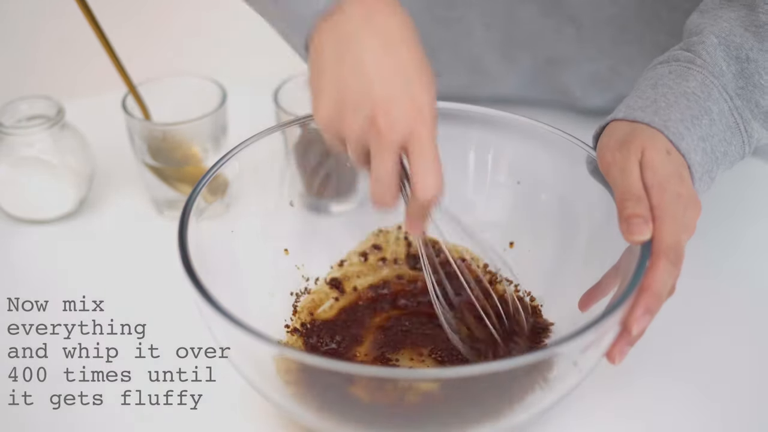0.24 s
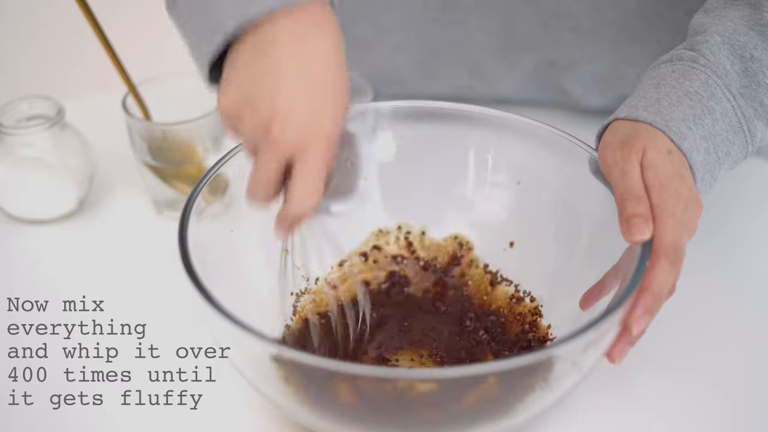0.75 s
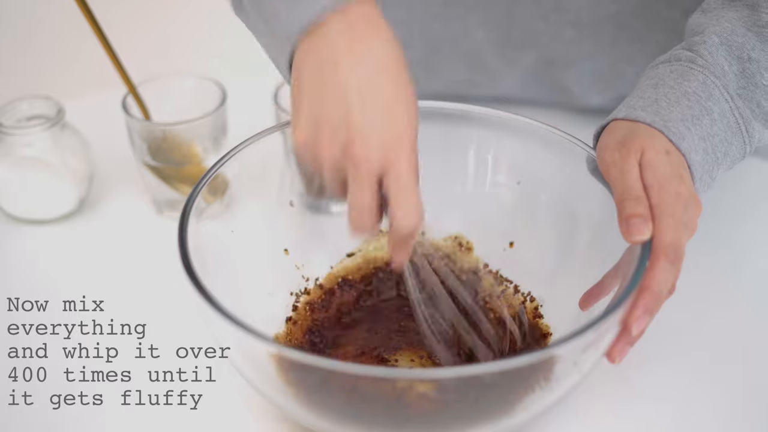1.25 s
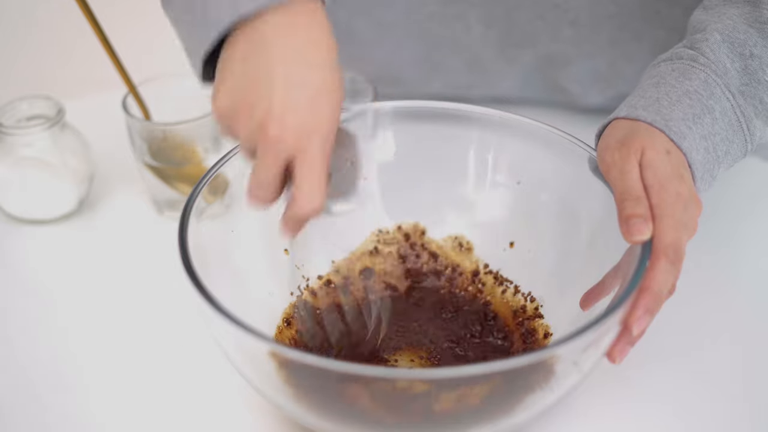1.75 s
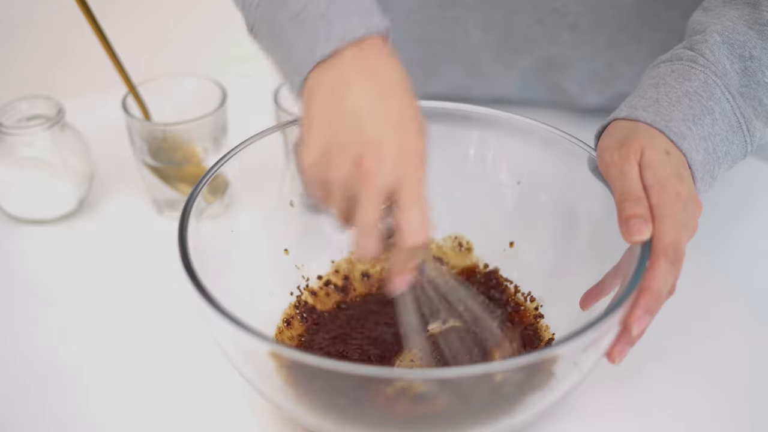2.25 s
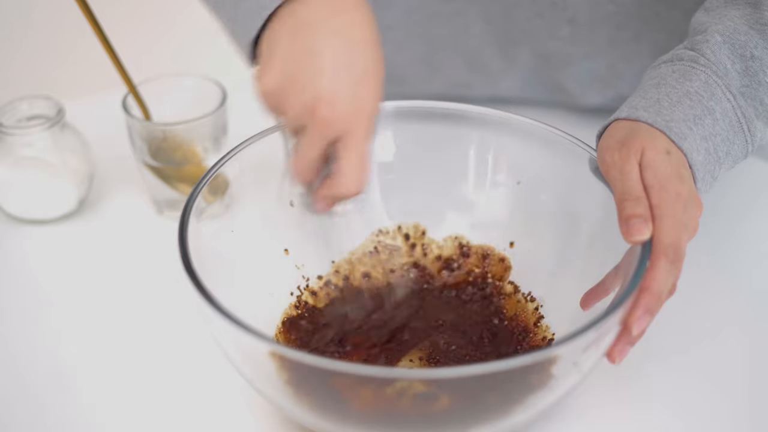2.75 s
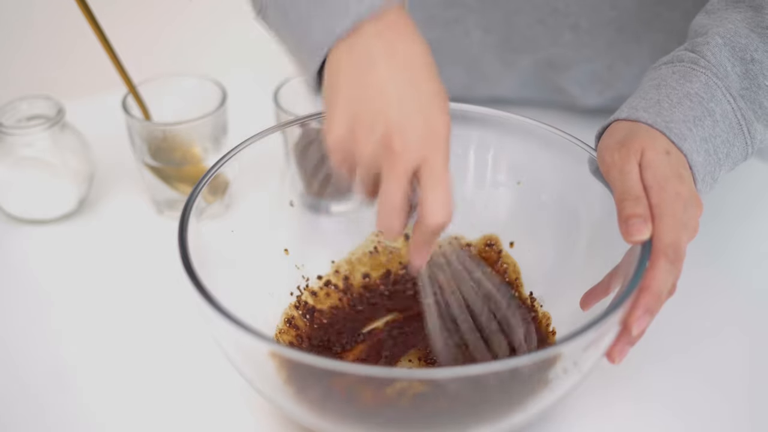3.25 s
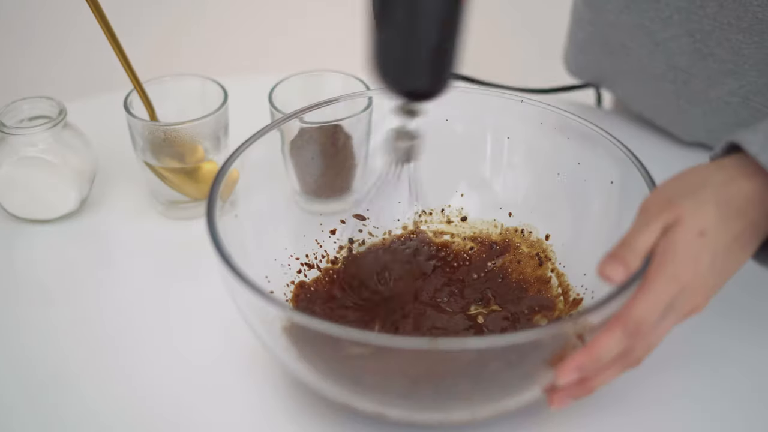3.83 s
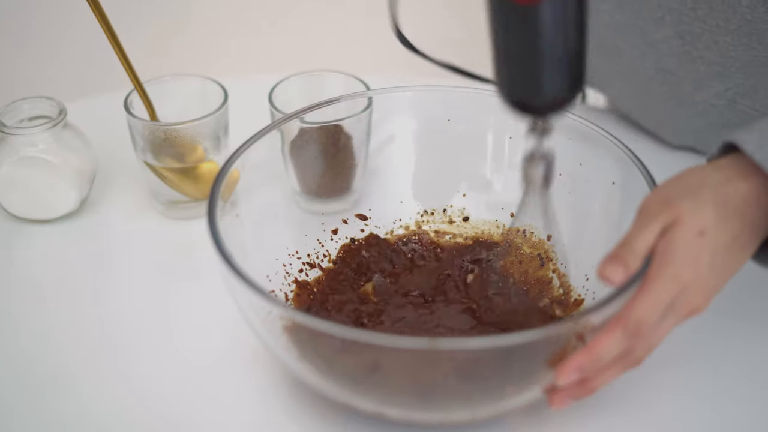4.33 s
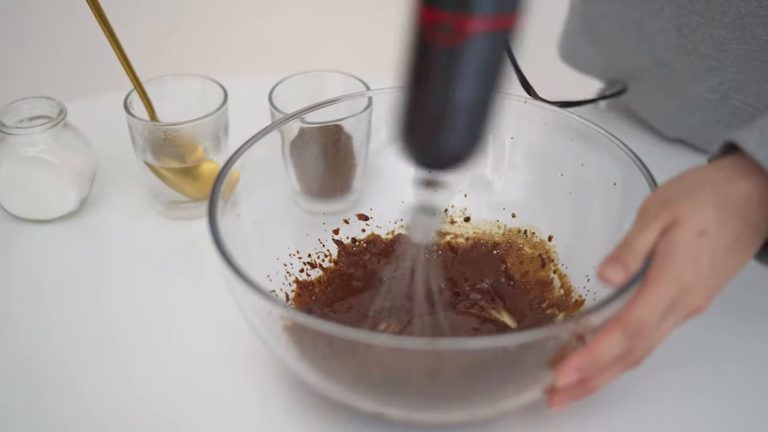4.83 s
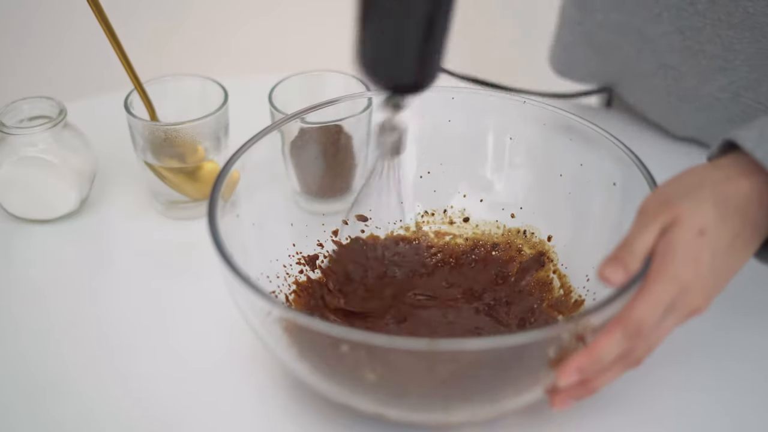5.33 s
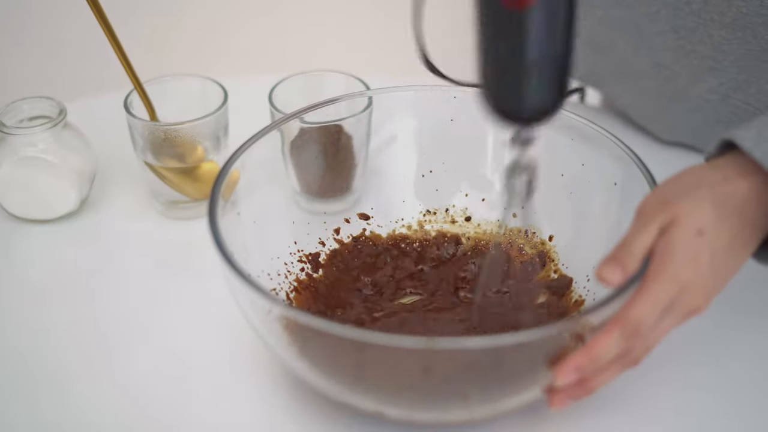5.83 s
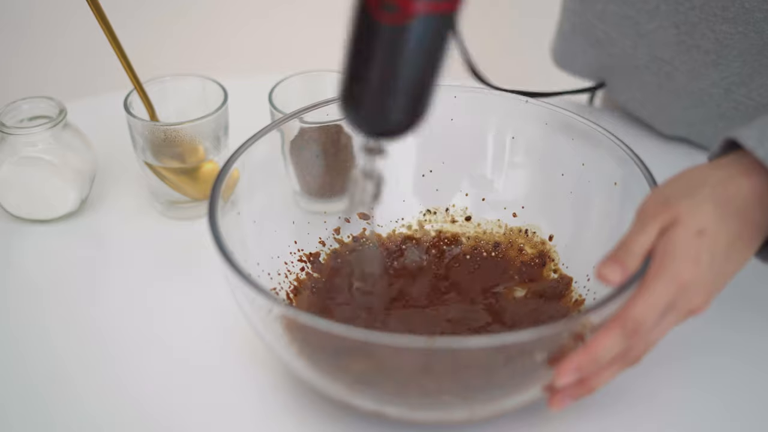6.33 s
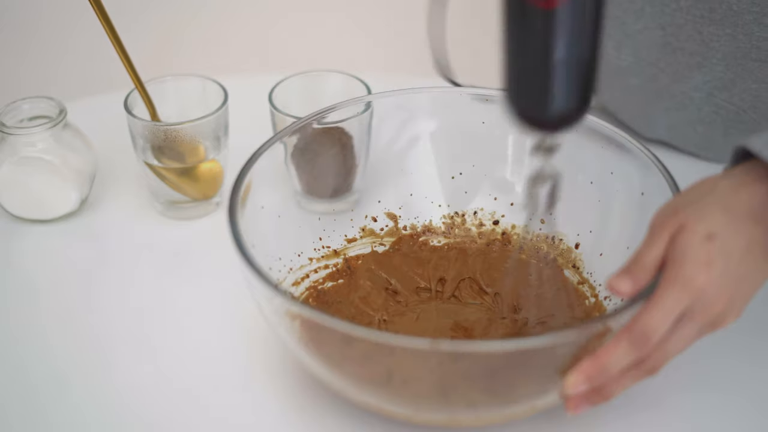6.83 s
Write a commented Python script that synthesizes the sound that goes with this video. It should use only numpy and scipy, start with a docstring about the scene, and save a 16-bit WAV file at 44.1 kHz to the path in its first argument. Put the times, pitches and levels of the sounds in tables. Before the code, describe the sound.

Brisk hand whisking of wet coffee paste in a glass bowl, three strokes a second, cut suddenly to a buzzing electric whisk drumming the bowl.

```python
"""A wire whisk scrapes, ticks and squelches round a glass bowl of thick coffee paste, three turns a second.
Slipping contacts excite the ringing wires, popping air makes the squelch, and bumps knock the bowl softly.
Then an electric whisk takes over at once: dense random hits ring its wires in a pulsing whirr,
spatter the paste and drum the wall of the bowl, with rattles and snaps on top.
The kitchen is small and quiet: a short tail of sparse reflections over a faint hush of noise."""
import sys
import numpy as np
from scipy import signal
from scipy.fft import rfft, irfft, next_fast_len
from scipy.io import wavfile

SR = 44100
rng = np.random.default_rng(int(sys.argv[2]) if len(sys.argv) > 2 else 0)


def bounce(signal):
    """Save signal as a 16-bit WAV file at the path given by the first command-line argument."""
    frames = np.transpose(np.atleast_2d(signal))
    limited = np.clip(frames, -1, 1)
    pcm = np.round(limited * 32767).astype(np.int16)
    wavfile.write(sys.argv[1], SR, pcm)


N = 311787
TIME = np.arange(N) / SR
SWITCH_S = 3.487  # the electric whisk takes over

# turns of the hand whisk, a push along the glass and a sweep back:
# (time [s], force of push [dB], length of push [s], force of sweep back [dB])
TURNS = [(0.145, -52, 0.027, -95), (0.476, -54, 0.05, -60), (.795, -52.5, 0.053, -73),
         (1.138, -54, 0.11, -75), (1.446, -54, 0.065, -58.5), (1.795, -51, 0.031, -60.5),
         (2.15, -57.5, 0.044, -59), (2.46, -57.5, 0.053, -60), (2.781, -58.5, 0.047, -79),
         (3.06, -57.5, 0.24, -68), (3.336, -58, 0.11, -58)]
# modes of the hand whisk's wires against the glass: (frequency [Hz], width [Hz], height [dB])
HAND_WIRES = [(1150, 130, -3), (2710, 90, 3), (4630, 110, 8.5), (6017, 47, 13), (6300, 31, 2),
              (7380, 80, 9), (9614, 110, 10.5), (11000, 160, 3), (12200, 110, 3)]
# ringing hiss of wires that builds up in the last turns by hand: (time [s], level [dB])
HISS = [(2.85, -87), (2.99, -58.5), (3.2, -60.5), (3.35, -57.5)]
# groups of fainter short rings: (frequency [Hz], scatter of pitch [share], level [dB])
GLINTS = [(1098, 0.085, -75.5), (2636, 0.055, -76), (4690, 0.04, -67.5)]
# a wire rubs along the wet glass in a short rough squeak: (time [s], frequency [Hz], level [dB])
SQUEAKS = [(0.331, 6200, -62.5), (0.344, 4630, -59.5), (0.408, 2750, -64), (0.466, 6010, -58),
           (0.709, 4580, -61), (0.784, 5920, -62), (1.135, 7340, -54.5), (1.163, 9260, -60),
           (1.26, 4660, -60.5), (1.48, 1160, -65.5), (1.733, 2780, -60), (2.261, 4770, -58),
           (2.373, 2910, -61), (2.45, 4530, -58), (2.517, 1082, -62.5), (3.081, 2850, -57.5),
           (3.265, 1009, -67.5)]
# a wire flicks against the glass: (time [s], level [dB], prominence of the wire's ring [dB])
TICKS = [(0.1304, -35, 4.5), (0.452, -46, -19), (.6786, -50, -5), (1.052, -40.5, 17), (1.109, -41, 9),
         (1.411, -46.5, -2), (1.4537, -43.5, 3), (1.7752, -41.5, 1), (2.030, -49.5, 13),
         (2.1271, -46.5, -1), (2.251, -47.5, -7), (2.295, -49.5, -29), (2.4315, -52, -17),
         (2.437, -44.5, -5), (2.482, -47.5, -21), (2.5926, -60, 4), (2.608, -45.5, 16),
         (2.6463, -47.5, -21), (3.124, -47, -24)]
# the whisk bumps the bowl through the paste: (time [s], relative strength [dB])
KNOCKS = [(0.53, -72), (1.117, -71), (1.183, -73), (1.327, -71), (1.494, -69), (1.778, -74.5),
          (2.294, -69.5), (2.444, -70), (2.653, -68), (3.042, -65.5), (3.253, -71)]
# low modes of the bowl on the table: (frequency [Hz], relative level [dB], t60 [s])
BOWL = [(198, -13.5, 0.26), (317, -1.5, 0.13), (351.6, -0.5, 0.16), (549.3, 2, 0.19), (601, 1.5, 0.13)]
# the circling electric whisk leans on the wall of the bowl: (time [s], force [dB], length [s])
LEANS = [(3.565, -55.5, 0.28), (3.944, -50.5, 0.15), (4.327, -50, 0.077), (4.717, -49.5, 0.2),
         (5.067, -48.5, 0.093), (5.165, -51, 0.11), (5.438, -51, 0.052), (5.772, -50.5, 0.1),
         (6.14, -51.5, 0.093), (6.478, -53, 0.087), (6.785, -52.5, 0.054), (6.962, -52.5, 0.038)]
# force of the electric whisk between leans, lighter where it rides up in the paste: (time [s], force [dB])
FREE_FORCE = [(3.7, -52), (4.55, -52.5), (4.88, -55), (5.55, -54), (6.35, -54.5), (6.87, -55.5)]
# rings of the electric whisk's single wires: (frequency [Hz], width [Hz], height [dB])
SPINNING_WIRES = [(4700, 130, 2.5), (5480, 350, -0.5), (9280, 120, 14)]
# rings of the spattering paste and wires: (frequency [Hz], width [Hz], height [dB])
BEATER = [(2193, 170, 13), (6950, 1200, 2.5), (9440, 700, -2)]
# modes of the bowl's wall, drummed while the whisk leans on it: (frequency [Hz], width [Hz], height [dB])
WALL = [(599, 17, 17.5), (870, 130, 14.5)]
# the spinning wires catch the glass and rattle on it: (time [s], level [dB], decay [s])
CLACKS = [(3.487, -44, 0.0053), (3.501, -42, 0.022), (3.548, -44, 0.049), (3.8434, -37.5, 0.005),
          (4.6561, -38, 0.011), (5.068, -43, 0.0039), (5.3124, -39.5, 0.0029), (5.3773, -43, 0.031),
          (5.435, -43, 0.0048), (5.9222, -45, 0.0027), (5.9565, -39, 0.0065), (6.4632, -42, 0.013),
          (6.518, -38, 0.0043), (6.613, -43, 0.05), (6.726, -42.5, 0.022), (7.006, -36.5, 0.0052)]
# a fleck of paste is flung against the wall with a bright snap: (time [s], level [dB])
SPITS = [(3.843, -35.5), (4.016, -38.5), (4.28, -37), (4.596, -35), (4.942, -42), (5.29, -44),
         (5.872, -41.5)]
# broad colour of the scraping wires: (frequency [Hz], relative density [dB per Hz])
SCRAPE = [(300, -63.5), (900, -6), (1800, 1), (3400, -2), (4100, -6), (5200, 3), (6900, 1), (8600, -2),
          (12000, -2.5), (14000, -5), (16000, -10)]
# broad colour of the squelching paste: (frequency [Hz], relative density [dB per Hz])
SQUELCH = [(240, -37), (450, -34.5), (700, -10.5), (950, 0.5), (2000, -9), (3500, 6), (6000, -11),
           (16000, -55)]
# broad colour of the whirring wires, and of the hiss by hand: (frequency [Hz], relative density [dB per Hz])
WHIRR = [(200, -77), (1500, -25.5), (3000, -20), (4150, -11), (4650, -7), (5330, -1), (5800, -4),
         (6300, -8), (6800, -8.5), (7700, -24.5), (16000, -32.5)]
# broad colour of the spatter: (frequency [Hz], relative density [dB per Hz])
SPATTER = [(340, -43), (510, -45.5), (750, -29), (1200, -19.5), (1900, -18), (2750, -6), (3350, 3.5),
           (5300, 0), (7800, -2.5), (9800, 1.5), (13000, -2), (14000, -8), (16000, -19.5)]
# broad colour of the drummed wall: (frequency [Hz], relative density [dB per Hz])
DRUMMING = [(400, -36), (800, -0.5), (2500, -20)]
# broad colour of a flung fleck's snap: (frequency [Hz], relative density [dB per Hz])
SPIT = [(200, -69), (1500, -35), (6500, -11.5), (10500, 10), (16000, -19.5)]
# how long the kitchen's reflections last: (frequency [Hz], t60 [s])
ROOM = [(200, 0.14), (2000, 0.085), (8000, 0.17), (16000, 0.012)]
# broad colour of the room's hush: (frequency [Hz], relative density [dB per Hz])
HUSH = [(20, -9), (90, -4.5), (16000, -7)]

RISE_SHARE = 0.49  # part of a stroke spent pressing in; the rest is the release
BACK_AFTER_S, BACK_LENGTH_S = 0.13, 0.089  # the sweep back follows about half a turn after the push
DRAG_DB, DRAG_DB_PER_S = -61, -3.5  # the steady drag between strokes eases as the paste loosens
GLINT_FOLLOW, CLUSTER_DB = 0.14, 2.8  # dB of ring for each dB of force; unevenness of the clusters
BUMP_DB_PER_OCTAVE = 4  # a short bump favours the higher modes of the bowl
WOBBLE_HZ, WOBBLE_DB = 15.9, 4.5  # while it leans, the whisk bounces off the wall at this rate and depth
# wires sweep past the wall at this rate, faster as the paste thins, and pulse the sound this deeply
PASS_HZ, PASS_HZ_PER_S, PASS_DB = 177, 11, 0.5
THUMP_S, THUMP_DB, THUMP_HZ = 6.487, -66, 483  # one thump: time, relative strength, upper edge
EDGE_HZ = 15800  # upper edge of the whole sound


def hand_whisk():
    """Wires scrape over the glass in short slips, jingle against each other and drag through the paste."""
    force_db = stirring_db()
    hiss_db, = follow(HISS)
    slips_db = 1.3 * wander(64)
    scrape = contacts(700, 2.4, 0.5) * amp(-2.5)
    rings = jingle(rng.uniform(1482, 15000, size=5000), 0.04, 17)
    rubbing = (scrape + amp(-3.0) * rings) * amp(force_db + slips_db)
    metal = wires(rubbing, SCRAPE, HAND_WIRES, hops_per_s=70, scatter=0.029, uneven_db=7)
    # small pockets of air pop in the paste, each at its own pitch
    pops = jingle(rng.uniform(476, 4472, size=6000), 0.033, 12)
    squelch = body(pops * amp(0.43 * force_db + 2 * wander(25) - 48.5), SQUELCH)
    hiss = body(contacts(940, 1.0, 0.54) * amp(hiss_db + slips_db), WHIRR)
    return muffled(metal, 0.2 * (force_db + 59)) + squelch + hiss


def stirring_db():
    """Force of the hand whisk on the glass: a push and a sweep back in each turn, over a steady drag."""
    power = amp(DRAG_DB + DRAG_DB_PER_S * TIME) ** 2
    for s, push_db, length_s, back_db in TURNS:
        push = amp(push_db) * stroke(s, length_s)
        back = amp(back_db) * stroke(s + BACK_AFTER_S, BACK_LENGTH_S)
        power += push ** 2 + back ** 2
    return 10 * np.log10(power)


def stroke(s, length_s):
    """The whisk presses in and lets go, a touch more slowly: a gain that peaks at one at time s."""
    t = (TIME - s) / length_s
    return np.exp(-abs(t) / np.where(t < 0, RISE_SHARE, 1 - RISE_SHARE) / 2)


def muffled(x, open_db, edge_hz=5800):
    """Paste round the wires damps the treble; pressing through to the glass opens it."""
    dull = signal.sosfiltfilt(signal.butter(2, edge_hz, fs=SR, output="sos"), x)
    return dull + (x - dull) * amp(open_db)


def glints():
    """Wires slip on the wet glass and ring for an instant, in uneven clusters that swell with the strokes."""
    press = unit(amp(GLINT_FOLLOW * stirring_db()) * (TIME < SWITCH_S))
    press = press * np.sqrt(SWITCH_S * SR / N)
    out = np.zeros(N)
    for hz, scatter, db in GLINTS:
        pitches_hz = hz * (1 + scatter * rng.standard_normal(size=400))
        out += jingle(pitches_hz, 0.07, 9.5) * amp(db + CLUSTER_DB * wander(15))
    return press * out


def squeaks(length_s=0.096, width_hz=230, drift=0.01533, stutter_db=5):
    """Stick and slip drive one resonance, which drifts in pitch, stutters, and dies as the wire passes."""
    out, t = np.zeros(N), np.arange(round(length_s * SR)) / SR
    swell = np.sin(np.pi * t / length_s)
    bend, grip = 1 + drift * wander(11), amp(stutter_db * wander(56))
    slips = wander(width_hz / 2) + 1j * wander(width_hz / 2)
    for s, hz, db in SQUEAKS:
        now = round(s * SR) + np.arange(len(t))
        phase = 2 * np.pi * np.cumsum(hz * bend[now]) / SR
        ring = (slips[now] * np.exp(1j * phase)).real
        add(out, s - length_s / 2, amp(db) * unit(swell * grip[now] * ring) / np.sqrt(2))
    return out


def ticks():
    """Single wires flick against the bowl: a burst of tiny bounces makes them ring briefly."""
    out = np.zeros(N)
    for s, db, ring_db in TICKS:
        add(out, s, amp(db) * body(chatter(0.0041), SCRAPE, HAND_WIRES, ring_db))
    return out


def knocks():
    """Bumps, and the small shoves of stirring between them, ring the bowl's low modes."""
    t = np.arange(SR // 2) / SR
    out = np.zeros(N)
    for hz, level_db, t60 in BOWL:
        push = amp(-88.0) * rng.standard_normal(N) * (rng.random(N) < 30 / SR)
        tilt_db = BUMP_DB_PER_OCTAVE * np.log2(hz / 400)
        for s, db in KNOCKS:
            favour_db = 2 * rng.standard_normal(1)  # each bump favours other modes
            add(push, s, amp(db - 9.5 + tilt_db + favour_db))
        soft_start = 1 - np.exp(-t / 0.0045)
        ring = amp(level_db - 60 * t / t60) * np.sin(2 * np.pi * hz * t) * soft_start
        out += signal.oaconvolve(push, ring)[:N]
    return out


def electric_whisk():
    """Dense wire hits whirr and ring; spatter and drumming of the wall swell as the whisk bears down."""
    force_db = leaning_db()
    pass_hz = PASS_HZ + PASS_HZ_PER_S * (TIME - SWITCH_S) + 9 * wander(8.9)
    passes = np.cumsum(pass_hz) / SR
    pulse_db = PASS_DB * np.cos(2 * np.pi * passes) + 1.0 * wander(210)  # no two wires strike alike
    judder_db = 1.2 * wander(39)  # the whisk bounces in the hand
    whirr = contacts(1800, 2.7, 0.9) * amp(0.5 * force_db - 19.0 + judder_db + pulse_db)
    hits = contacts(1800, 1.3, 0.73) * amp(judder_db + pulse_db)
    spatter = hits * amp(1.073 * force_db + 6.2)
    drumming = hits * amp(1.388 * force_db - 10.5)
    rattle = clacks() * amp(pulse_db)
    ringing = wires(whirr, WHIRR, SPINNING_WIRES, hops_per_s=55, scatter=.07, uneven_db=9)
    out = ringing + body(rattle, WHIRR)
    out += body(spatter + amp(-3.5) * rattle, SPATTER, BEATER)
    out += body(drumming + amp(-33.5) * rattle, DRUMMING, WALL)
    return out + spits()


def leaning_db():
    """Force of the electric whisk on the glass: each lean swells and fades, and sets the whisk bouncing."""
    free_db, = follow(FREE_FORCE)
    power = amp(free_db) ** 2
    for s, db, length_s in LEANS:
        t = TIME - s
        bounce_db = WOBBLE_DB * np.cos(2 * np.pi * WOBBLE_HZ * t)
        power += amp(db + bounce_db) ** 2 * np.exp(-(2 * t / length_s) ** 2)
    return 10 * np.log10(power)


def clacks():
    """Spinning wires catch the glass: dying bursts of bounces, before the glass and wires colour them."""
    out = np.zeros(N)
    for s, db, decay_s in CLACKS:
        add(out, s, amp(db) * chatter(decay_s))
    return out


def spits():
    """Flecks of paste snap against the wall: short bursts with a bright colour."""
    out = np.zeros(N)
    for s, db in SPITS:
        add(out, s, amp(db) * chatter(0.0037))
    return body(out, SPIT)


def thump():
    """A dull, short, faint thump: one impulse through a low-pass."""
    push = amp(THUMP_DB) * np.sqrt(SR / 100) * (np.arange(N) == round(THUMP_S * SR))
    return signal.sosfilt(signal.butter(4, THUMP_HZ, fs=SR, output="sos"), push)


def kitchen(x):
    """A short tail of sparse reflections, each band dying at its own pace, the extreme treble first."""
    taps = rng.choice([-1., 1.], SR // 2) * (rng.random(SR // 2) < 3000 / SR)
    taps[:round(.004 * SR)] = 0  # no reflection arrives sooner
    hz, t, z = signal.stft(taps, SR, nperseg=256)
    fade = amp(-60 * t / read(ROOM, hz)[:, None])
    tail = signal.istft(z * fade, SR, nperseg=256)[1]
    return signal.oaconvolve(x, tail / np.linalg.norm(tail))[:N]


def room_hush():
    """The quiet room's steady hush: faint coloured noise."""
    return amp(-99) * body(rng.standard_normal(N), HUSH)


def wires(x, spectrum, modes, hops_per_s, scatter, uneven_db, count=12):
    """The contact hops from wire to wire; each is tuned a little differently and favours other modes."""
    touching = rng.integers(0, count, N)[np.cumsum(rng.random(N) < hops_per_s / SR)]
    spread = np.tile(np.linspace(-1, 1, count), (2, len(modes), 1))
    detune, favour = rng.permuted(spread, axis=2)
    hz, width, db = np.transpose(modes)
    out = np.zeros(N)
    for k in range(count):
        own_hz = hz * (1 + scatter * detune[:, k])
        own_modes = np.transpose([own_hz, width, db + uneven_db * favour[:, k]])
        out += body(x * (touching == k), spectrum, own_modes, size=4096)
    return out


def contacts(per_s, spread_db, smooth):
    """Tiny impacts of uneven size over a share of smooth friction, rms one."""
    size = amp(spread_db * np.minimum(rng.exponential(1, N), 4))
    clicks = size * rng.choice([-1, 1], N) * (rng.random(N) < per_s / SR)
    return unit(unit(clicks) + smooth * rng.standard_normal(N))


def chatter(decay_s, size=8192):
    """A wire bouncing on glass: a burst of random signs that starts at one and dies away."""
    return rng.choice([-1, 1], size) * np.exp(-np.arange(size) / SR / decay_s)


def jingle(pitches_hz, t60, spread_db):
    """One short ring for each pitch, at a random moment of the hand whisking, rms one while it lasts."""
    t, out = np.arange(2500) / SR, np.zeros(N)
    fade = amp(-60 * t / t60)
    for hz, (when, strength) in zip(pitches_hz, rng.random((len(pitches_hz), 2))):
        add(out, when * SWITCH_S, amp(spread_db * strength) * fade * np.sin(2 * np.pi * hz * t))
    return unit(out) * np.sqrt(SWITCH_S * SR / N)


def body(x, spectrum, modes=(), ring_db=0, size=8192):
    """Passes x through a causal filter of unit energy: a broad colour with ringing modes on top."""
    hz = np.fft.rfftfreq(size, 1 / SR)
    peaks = sum(amp(db + ring_db) ** 2 / (1 + (2 * (hz - f) / width) ** 2) for f, width, db in modes)
    log_gain = np.log(amp(read(spectrum, hz)) * np.sqrt(1 + peaks))
    # minimum phase: the Hilbert transform of the log gain gives the phase
    circle = np.concatenate([log_gain, log_gain[-2:0:-1]])
    taps = np.fft.ifft(np.exp(np.conj(signal.hilbert(circle)))).real[:size // 2]
    return signal.oaconvolve(x, taps / np.linalg.norm(taps))[:len(x)]


def low_cut(x, hz):
    """A steep high-pass: small parts radiate no deep bass."""
    return signal.sosfilt(signal.butter(4, hz, "highpass", fs=SR, output="sos"), x)


def wander(rate_hz):
    """Smooth chance, fading out above the given rate, rms one."""
    size = next_fast_len(N, True)
    hz = np.fft.rfftfreq(size, 1 / SR)
    shape = (hz > rate_hz / 10) / (1 + (hz / rate_hz) ** 2)
    return unit(irfft(rfft(rng.standard_normal(size)) * shape, size)[:N])


def amp(db):
    """Decibels to gain."""
    return 10 ** (np.asarray(db) / 20)


def unit(x):
    """Scales to an rms of one."""
    return x / np.sqrt(np.mean(x ** 2) + 1e-30)


def read(points, hz):
    """Reads a table on a log-frequency axis."""
    f, value = np.transpose(points)
    return np.interp(np.log(hz + 1), np.log(f + 1), value)


def follow(rows):
    """One curve for each column after the time, at every sample."""
    s, *columns = np.transpose(rows)
    return [np.interp(TIME, s, c) for c in columns]


def add(mix, s, sound):
    """Lays a sound into the mix at time s."""
    part = mix[max(round(s * SR), 0):][:len(sound)]
    part += sound[:len(part)]


def scene():
    """Hand whisking, then the electric whisk, in the quiet room."""
    electric = np.clip((TIME - SWITCH_S) / 0.0016, 0, 1)
    by_hand = low_cut(hand_whisk() + glints() + squeaks() + ticks(), 330) + knocks()
    by_motor = low_cut(electric_whisk(), 310)
    direct = (1 - electric) * by_hand + electric * by_motor
    return (direct + amp(-14.0) * kitchen(direct) + thump() + room_hush())[None]


def record(dry):
    """Limits the band with a steep, linear-phase low-pass."""
    taps = signal.firwin(801, EDGE_HZ, window=("kaiser", 9), fs=SR)
    return signal.oaconvolve(dry, taps[None], "same")


dry = scene()
out = record(dry)
bounce(out)
```